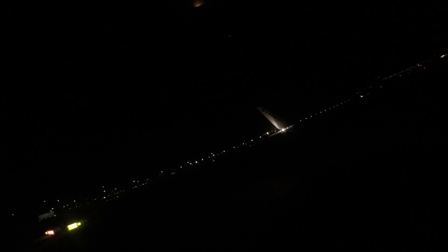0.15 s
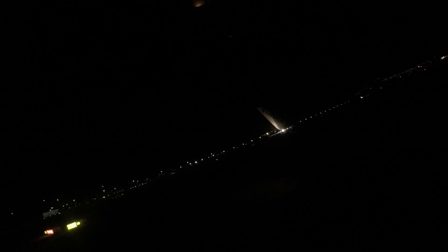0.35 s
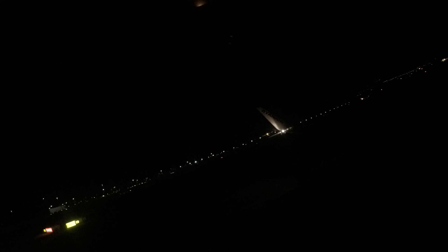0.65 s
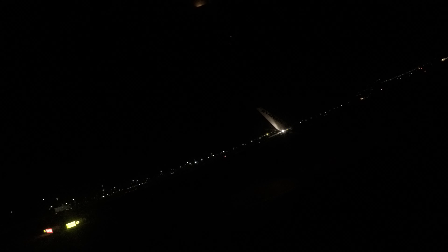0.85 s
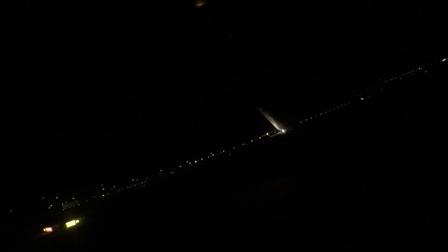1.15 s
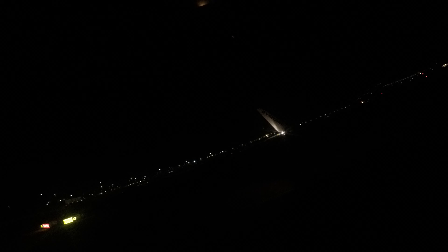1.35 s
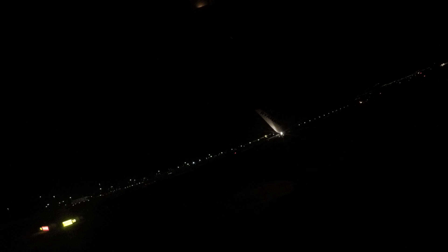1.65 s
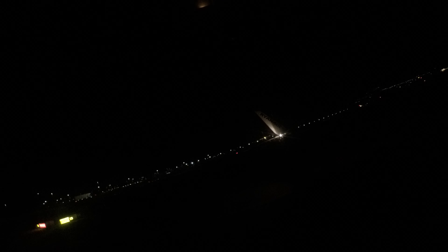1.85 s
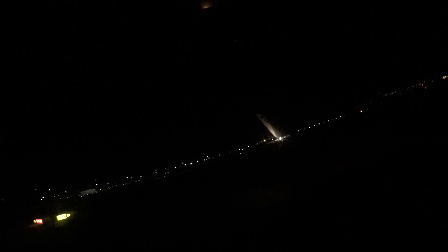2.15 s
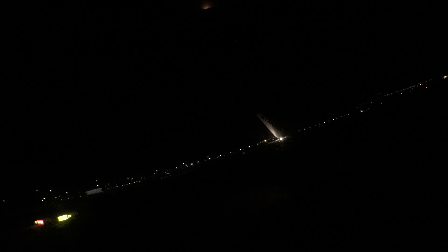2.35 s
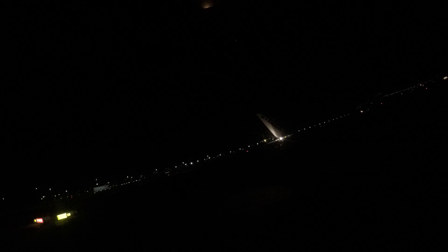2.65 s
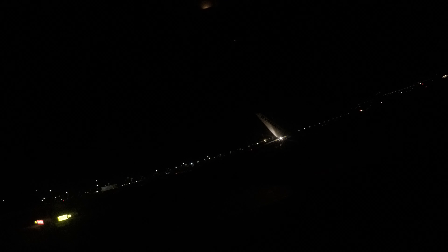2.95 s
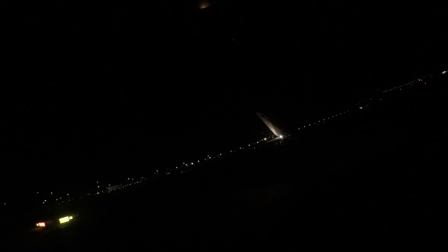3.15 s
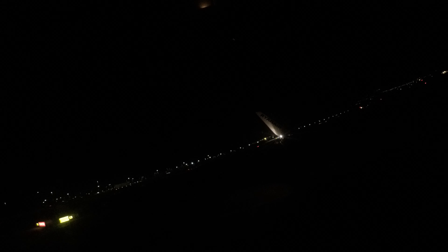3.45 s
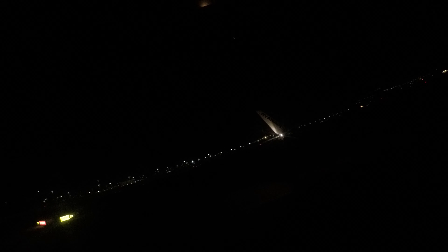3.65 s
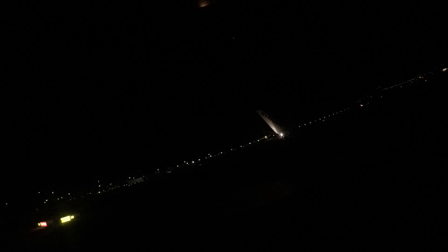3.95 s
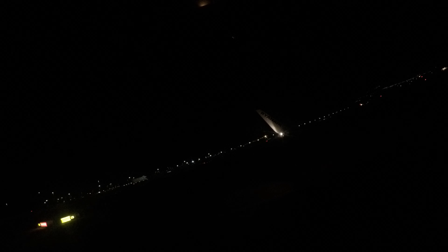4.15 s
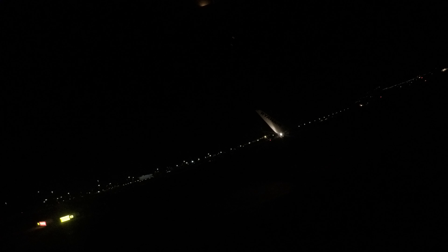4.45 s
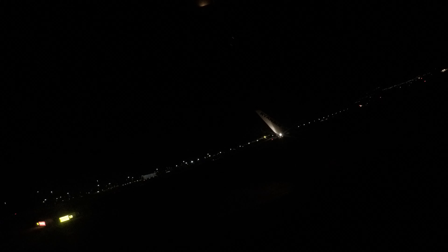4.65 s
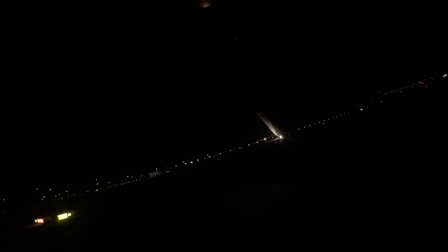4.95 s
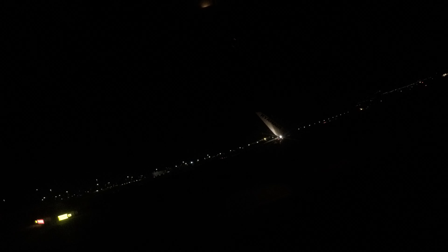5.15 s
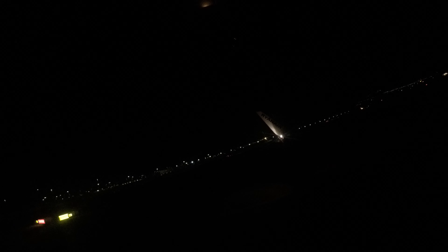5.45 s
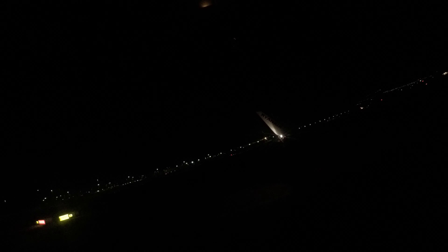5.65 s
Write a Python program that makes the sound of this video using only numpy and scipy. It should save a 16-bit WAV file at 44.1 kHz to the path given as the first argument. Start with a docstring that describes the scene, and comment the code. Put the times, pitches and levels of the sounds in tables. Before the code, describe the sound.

Wide airliner cabin rumble with soft finger rubs, then a hard knock muffles it to a dull hum amid fumbling bumps, slowly reopening.

```python
"""A jet airliner's cabin, heard through the two microphones of a phone held at the window.
Filtered noise makes the airframe's rumble and the air rush; wavering sines make the engines' buzz.
Fingers rub on the case, with low surges of noise; then a grip knocks, and the cabin drops to a
muffled hum, alike in both ears. Fingers shuffle and bump (jerks and impulses ringing in the case), and
the cabin slowly opens up again, with hollow swells near the end. Small ticks and squeaks join in."""
import sys
import numpy as np
from scipy import signal
from scipy.io import wavfile

SR = 44100
rng = np.random.default_rng(int(sys.argv[2]) if len(sys.argv) > 2 else 0)


def wrap_up_sound(samples):
    """Save the sound to the file named by the first command line argument, as 16-bit audio."""
    columns = np.atleast_2d(samples).T
    # keep every value between -1 and 1, then stretch to whole-number steps
    tamed = np.clip(columns, -1, 1)
    steps = np.round(tamed * 32767).astype(np.int16)
    wavfile.write(sys.argv[1], SR, steps)


N = 256338
TIME = np.arange(N) / SR  # seconds
GRIP_S = 1.806  # when the grip lands


def from_db(db):
    """Turn decibels into gain."""
    return 10 ** (np.asarray(db) / 20)


def rms_one(x):
    """Scale to an rms (average strength) of 1."""
    return x / np.sqrt(np.mean(x ** 2) + 1e-20)


def peak_one(x):
    """Scale to a peak of 1."""
    return x / np.abs(x).max()


def at_hz(points, hz):
    """Read a curve of (Hz, value) points on a log-frequency axis."""
    pitches, values = np.transpose(points)
    return np.interp(np.log(hz), np.log(pitches), values)


def cut(x, hz, kind, order=2):
    """Butterworth filter: keeps the lows, the highs or a band."""
    safe_hz = np.clip(hz, 5, .45 * SR)
    return signal.sosfilt(signal.butter(order, safe_hz, kind, fs=SR, output="sos"), x + 1e-18)


def resonate(x, hz, width_hz):
    """One resonance, with a gain of 1 at its top."""
    r = np.exp(-np.pi * width_hz / SR)
    feed = np.array([1, 0, -1]) * (1 - r * r) / 2
    feedback = [1, -2 * r * np.cos(2 * np.pi * hz / SR), r * r]
    return signal.lfilter(feed, feedback, x + 1e-18)


def drift(rate):
    """Smooth chance with spread 1, changing about rate times a second."""
    # Worked out at every 40th sample; the first 2000 steps only settle the filter.
    r = np.exp(-80 * np.pi * rate / SR)
    slow = signal.lfilter([1], [1, -2 * r, r * r], rng.standard_normal(N // 40 + 2002))[2000:]
    return np.interp(np.arange(N) / 40, np.arange(len(slow)), rms_one(slow))


def spread(pair, hz):
    """Two unrelated sounds become left and right, as alike as the cabin's field is at this pitch."""
    # Likeness of the two free microphones. Each row: pitch in Hz, correlation (1 is identical).
    likeness = [(60, 0.98), (150, 0.97), (320, 0.69), (600, 0.2), (1200, 0.091), (2300, 0.22), (3500, 0.65),
                (5500, -0.18), (12000, 0.078)]
    alike = np.clip(at_hz(likeness, hz), -.99, .99)
    difference = np.sqrt((1 - alike) / (1 + alike)) * pair[1]
    return pair[0] + difference * np.array([[1], [-1]])


def leak(hz):
    """Gain in time of what passes the hand at this pitch: it grows with the gap until fully through."""
    # What passes the gap; the bass is fully through first.
    # Each row: pitch in Hz, gain in dB at an opening of 0 dB, gain in dB when fully through.
    passing = [(120, -4.5, -4.5), (1010, -1, 10), (3150, 5, 12.5), (8000, 1.5, 15.5)]
    # The gap under the hand, which widens on the whole. Each row: time in seconds, opening in dB.
    gap = [(1.9, -13.5), (2.04, -7), (2.62, -11), (3.25, -6.5), (3.95, 0.5), (4.35, 0.5), (4.85, 4),
           (5.4, 6.5), (5.66, 14)]
    pitches, through_db, full_db = np.transpose(passing)
    through = np.interp(np.log(hz), np.log(pitches), through_db)
    full = np.interp(np.log(hz), np.log(pitches), full_db)
    opening = np.interp(TIME, *np.transpose(gap))
    return from_db(np.minimum(opening + through, full))


def rumble():
    """Turbulence shakes the fuselage and the cabin booms in broad resonances; gives (free, covered)."""
    # Booming resonances of the cabin. Each row: pitch in Hz, width in Hz,
    # level in dB with free microphones (before spread), level in dB when covered (before leak).
    booms = [(34.3, 23, -22.5, -31.5), (68.1, 25.4, -26.5, -37.5), (118, 43.2, -19, -28.5),
             (153.4, 31.6, -20.5, -30.5), (200.7, 80, -25.5, -35), (318.7, 34.7, -31, -43.5),
             (379, 102, -34, -47.5)]
    free, covered = 0, 0
    for hz, width_hz, free_db, covered_db in booms:
        shake = rng.standard_normal((2, N + SR // 2))  # the extra half second settles the filter
        band = cut(shake, [hz - width_hz / 2, hz + width_hz / 2], "band")
        pair = rms_one(band[:, -N:])
        free = free + from_db(free_db) * spread(pair, hz)
        covered = covered + from_db(covered_db) * pair[0] * leak(hz)
    return free, covered


def air_rush(flutter_db=1.05, open_db=-36.5, covered_db=-45.88):
    """Air along the skin and from the vents, fluttering slightly in every band; gives (free, covered)."""
    # Colour of the rush with free microphones. Each row: pitch in Hz, relative level in dB per Hz.
    open_colour = [(450, 1), (700, -10.5), (1000, -7), (1400, -12.5), (1750, -17.5), (2000, -17),
                   (2500, -19), (3000, -24), (3900, -23.5), (4700, -33), (5600, -27), (7500, -35),
                   (10500, -40.5), (14500, -63)]
    # Its colour when covered, before leak. Each row: pitch in Hz, relative level in dB per Hz.
    covered_colour = [(450, 6), (650, -1), (850, -6), (1050, -2), (1500, -10.5), (2300, -12.5),
                      (2900, -19.5), (3900, -20), (4700, -27.5), (5800, -34), (8000, -42.5), (10000, -45),
                      (12000, -61.5), (14500, -88.5)]
    edges = np.geomspace(430, 15000, 21)  # Hz
    centres = np.sqrt(edges[1:] * edges[:-1])
    white = rng.standard_normal((2, 2, N))
    free_gain = from_db(at_hz(open_colour, centres)) * np.sqrt(np.diff(edges))
    covered_gain = from_db(at_hz(covered_colour, centres)) * np.sqrt(np.diff(edges))
    free, covered = 0, 0
    for k, hz in enumerate(centres):
        band = rms_one(cut(white[k % 2], edges[k:k + 2], "band", order=3))
        pair = band * from_db(flutter_db * drift(5.8))
        free = free + free_gain[k] * spread(pair, hz)
        covered = covered + covered_gain[k] * pair[0] * leak(hz)
    free = from_db(open_db) * free / np.linalg.norm(free_gain)
    covered = from_db(covered_db) * covered / np.linalg.norm(covered_gain)
    return free, covered


def engines(shaft_hz=61.97, waver_db=3.5, wander=0.000443, phase_blur=0.51, steady_hz=100):
    """Uneven fan blades buzz on multiples of the shaft rate; high tones waver most; gives (free, covered)."""
    # Engine tones. Each row: multiple of the shaft rate, level in dB with free microphones
    # (before spread), level in dB when covered (before leak).
    tones = [(1, -20.5, -26.5), (2, -29.5, -28.5), (3, -30, -40), (5, -38, -47.5), (6, -34, -51),
             (7, -42.5, -54.5), (9, -45.5, -63), (10, -49, -70), (12, -56, -59.5), (15, -61, -66.5),
             (16, -54.5, -65.5), (18, -57, -63), (20, -63, -72.5), (21, -58.5, -68.5), (23, -67, -71),
             (26, -62.5, -70.5), (27, -58, -74.5), (47, -79, -85.5), (51, -78, -85.5), (53, -66, -77)]
    turn = 2 * np.pi * np.cumsum(shaft_hz * (1 + wander * drift(0.71))) / SR
    free, covered = 0, 0
    for multiple, free_db, covered_db in tones:
        hz = round(multiple) * shaft_hz
        unrest = hz / (hz + steady_hz)  # high tones get unsteady on their way in
        phase = round(multiple) * turn + unrest * phase_blur * drift(1.94)
        waver = from_db(unrest * waver_db * drift(7.0))
        pair = np.sqrt(2) * waver * np.sin([phase, phase + 2 * drift(0.79)])
        free = free + from_db(free_db) * spread(pair, hz)
        covered = covered + from_db(covered_db) * pair[0] * leak(hz)
    return free, covered


def case(force, ring_hz=680, width_hz=750, soft_hz=600):
    """The phone's case answers a soft fingertip with one heavily damped resonance."""
    return cut(resonate(force, ring_hz, width_hz), soft_hz, "low", order=1)


def port(force, low_hz, high_hz, skin_hz):
    """Skin pumps the air in the microphone port: a slow, dull push."""
    slow = cut(force, high_hz, "low", order=1)
    dull = cut(slow, skin_hz, "low")
    return -cut(dull, low_hz, "high")


def crackle(force, creak_db=-28, relax_s=0.07, crisp_db=-54.5, hz=6800, width_hz=3000):
    """Dry skin snaps brightly on the case, most of all from the squeeze until the new grip relaxes."""
    squeeze = (TIME > GRIP_S) * np.exp(-np.abs(TIME - GRIP_S) / relax_s)
    gain = from_db(crisp_db) + from_db(creak_db) * squeeze
    return -gain * resonate(force, hz, width_hz)


def rubs(slips_per_s=1000, size_db=5.4, hiss=0.04, pressure_db=2.5, attack_s=0.0073, release_s=0.031):
    """Skin sticks and slips in uneven jerks under a wavering pressure; gives (case, push)."""
    # Finger strokes on the case. Each row: start in seconds, end in seconds,
    # scrape level in dB (before the filters in handling), pitch of the scrape in Hz.
    strokes = [(0.146, 0.495, -40.5, 680), (0.78, 0.906, -37, 600), (1.177, 1.222, -36, 600),
               (1.387, 1.706, -36, 640), (1.83, 1.834, -30, 560), (1.86, 1.87, -33, 520),
               (1.935, 2.052, -43, 510), (2.053, 2.113, -38, 520), (2.141, 2.186, -25, 620),
               (2.193, 2.242, -33, 580), (2.257, 2.384, -34.5, 615), (2.41, 2.451, -33.5, 680),
               (2.555, 2.613, -36, 522), (2.643, 2.71, -55, 900), (2.713, 2.743, -35, 690),
               (2.755, 2.798, -33, 453), (2.809, 2.855, -45, 680), (2.853, 2.93, -63, 900),
               (2.922, 2.947, -35, 680), (2.945, 2.983, -34, 670), (2.99, 3.067, -47, 804),
               (3.083, 3.13, -36, 654), (3.14, 3.224, -45, 750), (3.328, 3.498, -52.5, 550),
               (3.841, 3.858, -47, 560)]
    usual_scrape_db, usual_push_db = -33.5, -21.5
    push_slope = 0.78  # dB more push per dB of scrape
    sizes = from_db(size_db * np.minimum(rng.exponential(1, N), 3))
    slips = (rng.random(N) < slips_per_s / SR) * rng.choice([-1, 1], N) * sizes
    force = (slips + hiss * rng.standard_normal(N)) * from_db(pressure_db * drift(83))
    snaps = crackle(force)
    pumping = port(force, low_hz=28, high_hz=78.5, skin_hz=460)
    out = np.zeros((2, N))
    for start, end, scrape_db, hz in strokes:
        scrape = case(force, hz, 1.22 * hz, hz) + snaps  # a lower pitch is also duller
        paths = np.array([scrape, pumping])
        push_db = usual_push_db + push_slope * (scrape_db - usual_scrape_db)
        fade = np.minimum((TIME - start) / attack_s, (end - TIME) / release_s)
        stroke = np.clip(fade + .5, 0, 1)
        strength = np.sqrt(paths ** 2 @ stroke ** 2 / (abs(end - start) * SR + 1) + 1e-20)
        gains = from_db([scrape_db, push_db]) / strength
        out += paths * stroke * gains[:, None]
    return out


def swells(sharpness=6.4):
    """Bands of noise rise and fall: low surges as fingers rub early on, hollow swells near the end."""
    # Each row: middle in seconds, half length in seconds, pitch in Hz, level at the top in dB.
    surges = [(0.206, 0.056, 339, -20.5), (0.342, 0.014, 400, -20), (0.652, 0.047, 330, -20.5),
              (0.815, 0.041, 357, -23.5), (1.406, 0.0095, 486, -41), (1.572, 0.032, 344, -18.5),
              (5.412, 0.055, 690, -37.5), (5.418, 0.054, 1400, -41.5), (5.706, 0.043, 656, -36),
              (5.723, 0.18, 206, -30.5), (5.744, 0.029, 397, -29), (5.724, 0.05, 1060, -47)]
    out = 0
    for s, half_s, hz, level_db in surges:
        edges = [hz - hz / sharpness, hz + hz / sharpness]
        band = rms_one(cut(rng.standard_normal(N), edges, "band"))
        out = out + from_db(level_db) * band * np.exp(-((TIME - s) / half_s) ** 2)
    return out


def ticks(top_ratio=1.2, thud_s=3.5645, thud_db=-18):
    """Plastic trim ticks: a short rattle rings in one broad resonance; one low thud joins them."""
    # Ticks of cabin fittings. Each row: time in seconds, half of the peak in dB, pitch in Hz,
    # time in seconds for the rattle to fade by 60 dB.
    fittings = [(0.2, -46, 5900, 0.12), (0.281, -33, 2900, .035), (0.281, -41, 6000, .03),
                (3.5632, -32, 2000, 0.01), (4.855, -45, 4300, 0.06)]
    out = np.zeros(N)
    age = np.arange(SR // 4) / SR
    for s, level_db, hz, t60 in fittings:
        rattle = rng.standard_normal(len(age)) * np.exp(-np.log(1000) * age / t60)
        burst = cut(resonate(rattle, hz, hz / 2), top_ratio * hz, "low", order=4)
        start = int(s * SR)
        out[start:start + len(age)] += from_db(level_db) * peak_one(burst) * 2
    blow = signal.unit_impulse(N, int(thud_s * SR))
    thud = cut(resonate(blow, hz=48, width_hz=16), 500, "low", order=1)
    return out + from_db(thud_db) * peak_one(thud)


def squeak(waver=.008):
    """Sliding skin now and then gives a thin, brief squeak, slightly unsteady in pitch."""
    # Each row: middle in seconds, half length in seconds, pitch in Hz, level at the top in dB.
    squeaks = [(1.7995, 0.005, 7950, -47), (2.849, 0.013, 4210, -59)]
    turn = 2 * np.pi * np.cumsum(1 + waver * drift(60)) / SR
    out = 0
    for s, half_s, hz, level_db in squeaks:
        out = out + from_db(level_db) * np.sin(hz * turn) * np.exp(-((TIME - s) / half_s) ** 2)
    return out


def grip_thud(left_db=3.0, left_hz=440, right_db=-2.0, right_hz=760, snap_db=-16, push_db=-7.0):
    """A soft pad flexes the case, lower on the left, with a dry snap; it seals the left port with a pop."""
    pad_hz, snap_hz, seal_s = 2200, 2500, 0.002
    force = signal.unit_impulse(N, int((GRIP_S - .0020) * SR))
    left = peak_one(cut(case(force, left_hz, left_hz, left_hz), pad_hz, "low"))
    right = peak_one(cut(case(force, right_hz, right_hz, right_hz), pad_hz, "low"))
    snap = peak_one(cut(resonate(force, snap_hz, snap_hz), 1.5 * snap_hz, "low", order=4))
    seal = np.roll(force, int(seal_s * SR))  # just after the touch
    pop = peak_one(port(seal, low_hz=14, high_hz=35, skin_hz=260))
    left_ear = from_db(push_db) * pop - from_db(left_db) * left
    right_ear = from_db(right_db) * right
    return np.array([left_ear, right_ear]) - from_db(snap_db) * snap


def bump_port(force):
    """A whole fingertip presses slowly on the port."""
    return port(force, low_hz=9.6, high_hz=28, skin_hz=335)


def knocks(skid_s=0.003, skid_share=0.23, damping=1.3):
    """Each bump knocks the case, skids once and pushes on the port; gives (case, push)."""
    # Fingers bump and catch on the case. Each row: time in seconds, knock level in dB,
    # low push level in dB (both before the trims in handling), pitch of the knock in Hz.
    bumps = [(1.8375, -22, -32, 550), (1.853, -18, -25, 700), (1.861, -19, -29, 600),
             (1.8714, -6.5, -15, 580), (1.8765, -10, -16, 550), (1.8886, -7, -18, 580),
             (1.9086, -10, -14, 580), (2.0599, -17, -10, 420.0), (2.083, -22, -7, 500.0),
             (2.1209, -8, -8, 350.0), (2.1259, -7.5, -5, 700.0), (2.1493, -4, -12, 500.0),
             (2.1618, -4.5, -13, 350.0), (2.1728, -16, -18, 700.0), (2.1793, -14, -14, 500.0),
             (2.189, -13, -14, 350.0), (2.1946, -15, -19, 350.0), (2.209, -18.0, -26, 420.0),
             (2.2653, -14, -9, 500.0), (2.269, -9.5, -14, 420.0), (2.275, -13, -13, 420.0),
             (2.2893, -28, -20, 350.0), (2.3109, -19, -16, 350.0), (2.3187, -19, -29, 600.0),
             (2.333, -14, -13.5, 350.0), (2.361, -11, -17, 450.0), (2.378, -20, -40, 420.0),
             (2.3934, -13.5, -10.5, 500.0), (2.4243, -23, -22, 350.0), (2.447, -12.5, -13, 450),
             (2.45, -13, -5, 500.0), (2.5165, -5.5, -9.5, 420.0), (2.5195, -11.5, -19, 600),
             (2.5434, -5.5, -8.5, 597), (2.5505, -11, -12, 503), (2.5674, -18, -9, 350.0),
             (2.5784, -16.5, -20, 500.0), (2.599, -22, -10, 350.0), (2.7166, -13.5, -8.5, 450),
             (2.729, -25, -10.5, 500.0), (2.7338, -19, -28, 420.0), (2.742, -20, -16, 350.0),
             (2.761, -25, -24, 350.0), (2.766, -21, -12.5, 350.0), (2.771, -15, -14, 350.0),
             (2.7787, -29, -10.5, 350.0), (2.798, -19, -17, 850), (2.8255, -20, -34, 700.0),
             (2.8356, -21, -29, 700.0), (2.8406, -19.5, -21, 420.0), (2.9217, -15.5, -13.5, 420.0),
             (2.952, -18, -15, 850.0), (2.9547, -9.5, -12, 700.0), (2.966, -14, -14, 350.0),
             (2.9728, -18, -17, 500.0), (3.024, -14.5, -12.5, 500.0), (3.0398, -23.0, -29, 503),
             (3.057, -22, -29, 500.0), (3.0766, -14.5, -24, 420.0), (3.084, -24, -29.0, 420.0),
             (3.096, -24, -16, 420.0), (3.0999, -27, -14.5, 350.0), (3.1066, -20, -15.5, 350.0),
             (3.117, -24, -30.0, 420.0), (3.1744, -17.5, -20, 420.0)]
    chance = rng.random((len(bumps), 3))
    click = signal.unit_impulse(SR // 10)
    body, snaps, presses = np.zeros((3, N))
    for (s, knock_db, push_db, hz), (turn, delay, skid_turn) in zip(bumps, chance):
        at, sign = int(s * SR), np.sign(turn - .5)
        colour = hz, damping * hz, hz  # a lower pitch is also duller
        skid = np.roll(click, int((1 + delay) / 2 * skid_s * SR))
        blow = sign * click + skid_share * np.sign(skid_turn - .5) * skid
        knock = case(blow, *colour) / np.abs(case(click, *colour)).max()
        body[at:at + len(click)] += from_db(knock_db) * knock
        snaps[at] = sign * from_db(knock_db)
        presses[at] = sign * from_db(push_db)
    body = body + crackle(snaps) / np.abs(case(click)).max()
    push = bump_port(presses) / np.abs(bump_port(click)).max()
    return body, push


def handling(gripped, knock_db=-3.0, bump_push_db=1.5, rub_push_db=-1.5, loose_push_db=-3.0):
    """The flexing case drives the microphones in opposite senses; the grip shields the right port."""
    (knock, bump), (scrape, slide) = knocks(), rubs()
    body = cut(from_db(knock_db) * knock + scrape, 10800, "low", order=5)
    slide_db = rub_push_db + (1.0 - gripped) * loose_push_db  # strokes push harder under the grip
    push = from_db(bump_push_db) * bump + from_db(slide_db) * slide
    far = cut(body + (1 - gripped) * push, 3300, "low", order=3)  # the far microphone is duller
    return np.array([body + push, -far])


def scene():
    """The cabin is wide until the grip lands, then muffled and alike in both ears."""
    gripped = np.clip((TIME - GRIP_S) / .004 + .5, 0, 1)
    free, covered = (sum(parts) for parts in zip(rumble(), air_rush(), engines()))
    cabin = (1 - gripped) * free + gripped * covered
    return cabin + swells() + ticks() + squeak() + grip_thud() + handling(gripped)


def record(dry, cutoff_hz=14500):
    """Peaks beyond full scale overload the input and are clipped; the top of the treble is cut."""
    clipped = np.clip(dry, -1, 1)
    return signal.sosfilt(signal.cheby2(12, 60, cutoff_hz, fs=SR, output="sos"), clipped)


dry = scene()
out = record(dry)
wrap_up_sound(out)
```